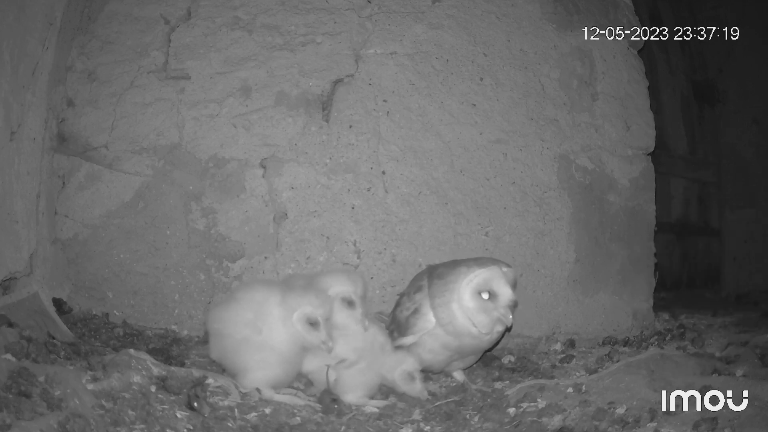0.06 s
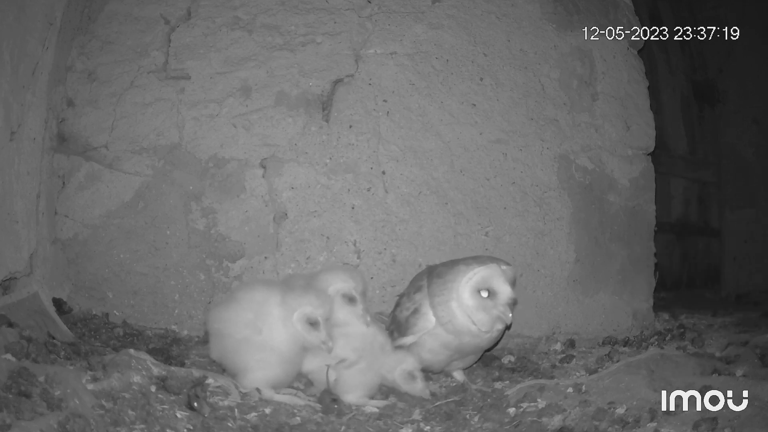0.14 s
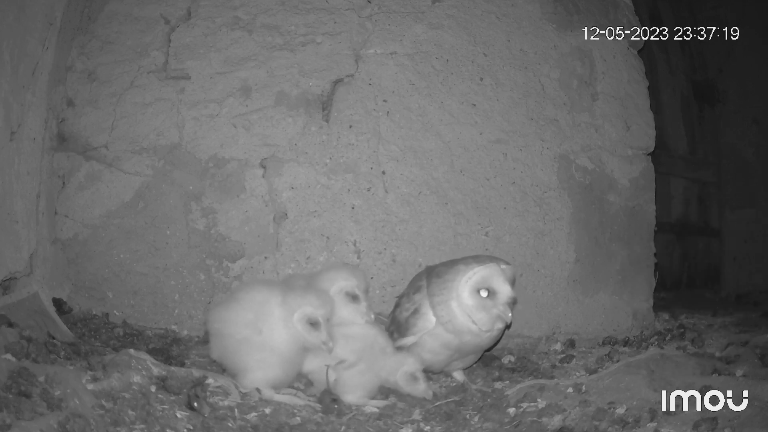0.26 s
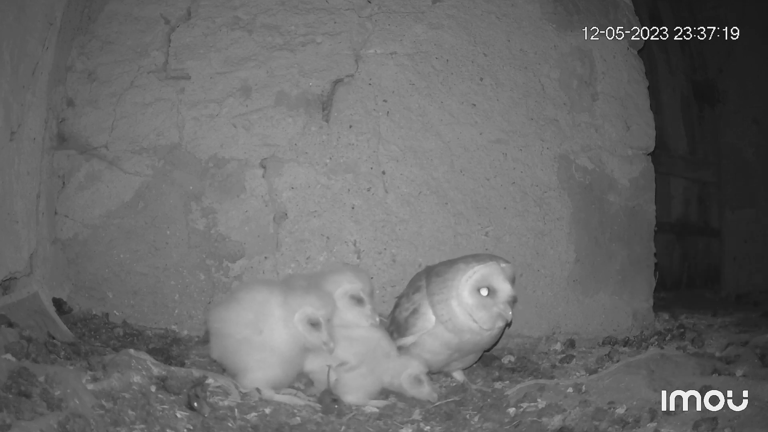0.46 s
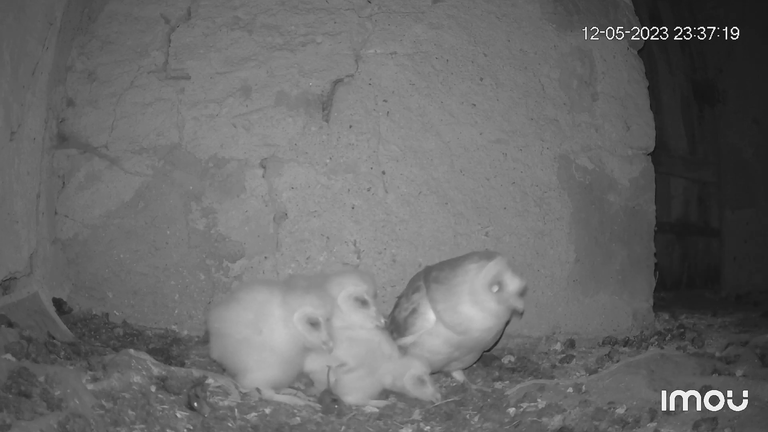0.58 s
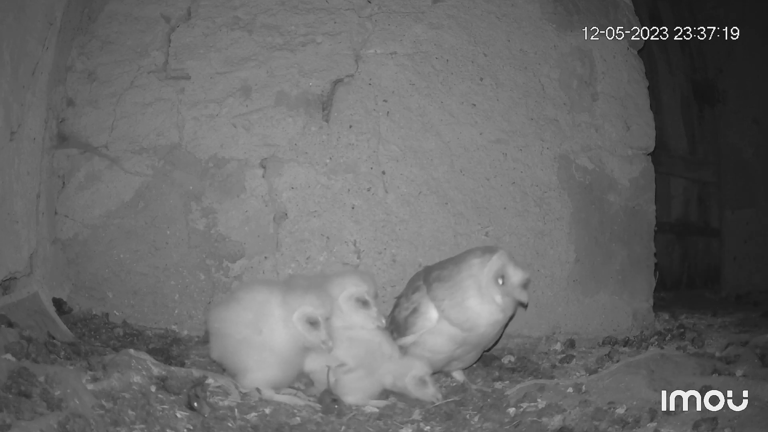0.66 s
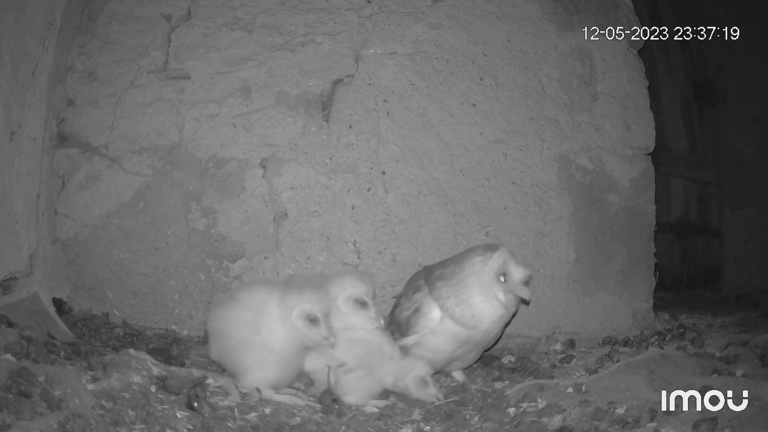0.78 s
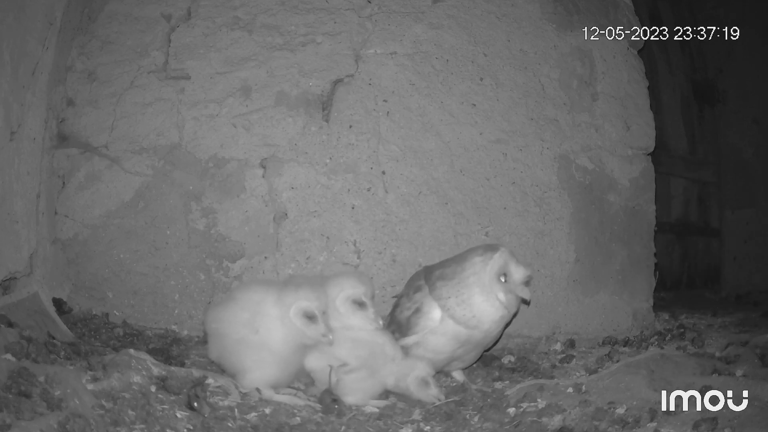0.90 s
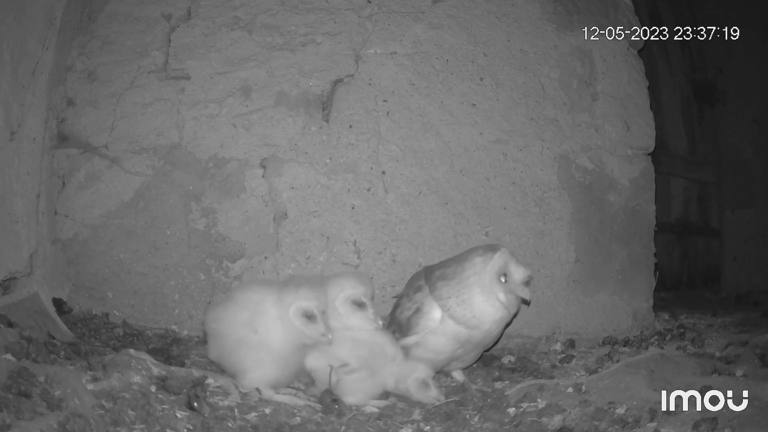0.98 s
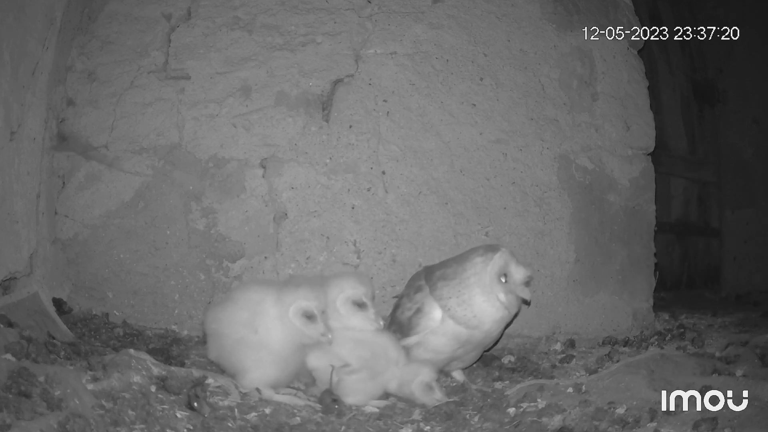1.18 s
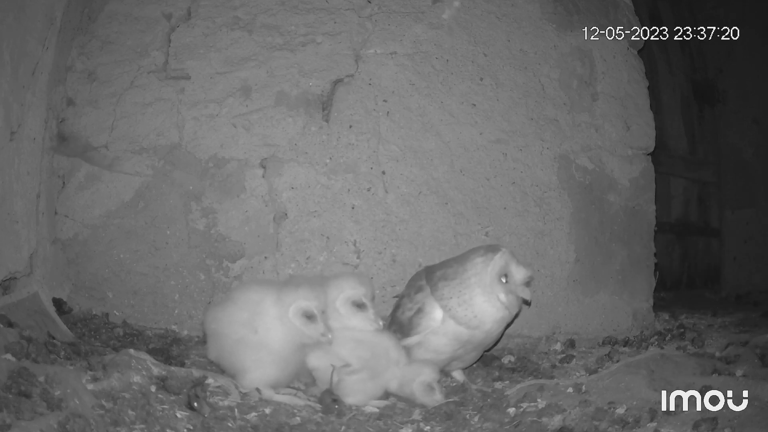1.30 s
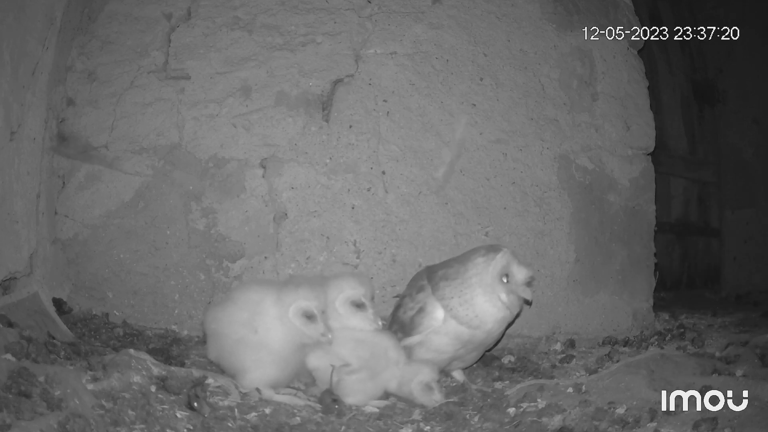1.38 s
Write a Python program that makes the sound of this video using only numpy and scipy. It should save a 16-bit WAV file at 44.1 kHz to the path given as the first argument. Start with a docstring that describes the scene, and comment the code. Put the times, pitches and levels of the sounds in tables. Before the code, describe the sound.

Raspy barn owl screech in a small stone nest space, cut off with a tiny beak snap, then deep puffs of wing-stirred air on the camera microphone, near quiet, and a second, weaker rasp farther off.

```python
"""Barn owls in a stone chamber

Two barn owls rasp in a stone nest chamber, one near and one further off, before a small camera microphone.
Breath forced through a fluttering throat rings its resonances; a beak snaps and a chick peeps faintly. Air
stirred by wings buffets the microphone: a low draught throughout and a string of puffs, a few of them hard,
with two brief higher tones ringing near the hardest. Noise is filtered for breath, beak and draught; the peep
is a falling sine, each puff a short swing of pressure."""
import sys
import numpy as np
from scipy import signal
from scipy.fft import rfft, irfft
from scipy.io import wavfile
from scipy.ndimage import uniform_filter1d

SR = 44100
rng = np.random.default_rng(int(sys.argv[2]) if len(sys.argv) > 2 else 0)


def ratio(d):
    """dB to gain"""
    e = np.asarray(d, float) / 20
    return 10 ** e


def waveform_to_disk(signal):
    """Save audio, clipped to [-1, 1], as 16-bit WAV at the path in sys.argv[1]."""
    frames = np.transpose(np.atleast_2d(signal))
    scaled = np.clip(frames, -1, 1) * 32767
    samples = np.round(scaled).astype(np.int16)
    wavfile.write(sys.argv[1], SR, samples)


N = 63945
T = np.arange(N) / SR  # time [s]


def curve(rows):
    """Straight lines through (time [s], value) rows."""
    return np.interp(T, *np.array(rows).T)


def unit(x):
    """Scale to rms 1."""
    return x / np.sqrt(np.mean(x ** 2))


def walk(rate_hz):
    """Smooth random wander of spread 1, from noise averaged twice over one period of the rate."""
    length = max(int(SR / rate_hz), 2)
    wander = uniform_filter1d(uniform_filter1d(rng.standard_normal(N), length), length)
    return unit(wander - wander.mean())


def ring(x, hz, width_hz):
    """A steep-sided resonance, so that the valleys between resonances stay dark."""
    edges = [hz - width_hz / 2, hz + width_hz / 2]
    return signal.sosfilt(signal.butter(3, edges, "band", fs=SR, output="sos"), x)


def owl(effort, top_db, throat, flutter_hz, flutter_depth, flicker_db):
    """Grainy turbulence, pulsed by a flapping membrane, rings a throat whose colour shifts with effort."""
    breathing = (T >= effort[0][0]) & (T <= effort[-1][0])
    effort_db = np.where(breathing, curve(effort), -150)
    phase = 2 * np.pi * np.cumsum(flutter_hz * (1 + 0.047 * walk(8.7))) / SR
    grains = rng.standard_normal(N) * ratio(1.5 * walk(330))  # grain size scatters by 1.5 dB
    breath = grains * (1 + flutter_depth * np.cos(phase))
    rings = [ring(breath, hz, width_hz) * ratio(db) for hz, width_hz, db, _ in throat]
    size = np.sqrt(np.mean(sum(rings) ** 2))
    above_top_db = np.clip(effort_db - top_db, -30, 6)
    rasp = 0
    for voice, (_, _, _, extra) in zip(rings, throat):
        rasp = rasp + voice * ratio(effort_db + extra * above_top_db + flicker_db * walk(40))
    return rasp / size


# Breath effort of the near owl: (time [s], effort [dB])
NEAR_EFFORT = [(0, -85.5), (.014, -74.5), (.028, -56), (.045, -49), (.1, -42.5), (.2, -40), (.25, -38.5),
               (.3, -40), (.345, -40.5), (.366, -57), (.392, -86.5)]
# Throat resonances of the near owl:
# (frequency [Hz], width [Hz], level [dB], extra level per effort [dB/dB])
NEAR_THROAT = [(480, 277, -21, -0.8), (1151.6, 294, -5.5, -0.39), (1291.3, 100, -1.5, 0),
               (1584, 125, -6.5, 1), (1855, 150, -14, 0), (2196, 180, -13.5, 2), (2610, 230, -7.5, -0.72),
               (3310, 550, -1.5, 0), (3766, 520, -3.5, -0.4), (4008, 300, 0.5, 3.24), (4556, 360, -15, 1.4),
               (6450, 800, -15.5, 3), (6810, 470, -20, 2.5)]


def near_owl():
    """One rasp close by, its throat flapping deeply; top_db is the effort that adds no extra level."""
    return owl(NEAR_EFFORT, top_db=-39, throat=NEAR_THROAT,
               flutter_hz=45.6, flutter_depth=0.33, flicker_db=2.6)


# Breath effort of the far owl: (time [s], effort [dB])
FAR_EFFORT = [(1.134, -96), (1.139, -67), (1.21, -65.5), (1.29, -57), (1.375, -54.5), (1.4, -54.5),
              (1.42, -56), (1.45, -54.5)]
# Throat resonances of the far owl:
# (frequency [Hz], width [Hz], level [dB], extra level per effort [dB/dB])
FAR_THROAT = [(851, 235, -6, 0.55), (1269, 320, -1, -.5), (1686, 67, -6, -0.86), (2039, 170, 1, 0.29),
              (2520, 290, -1, 0.07), (3250, 410, -4.5, 1), (3906, 460, -3, 0.019), (4750, 350, -16, 0.97),
              (5150, 660, -11.5, 1), (5860, 447, -14.5, .8), (7000, 150, -49, .3)]


def far_owl():
    """A fainter rasp that swells at the end, with a faster and shallower flutter."""
    return owl(FAR_EFFORT, top_db=-49.5, throat=FAR_THROAT,
               flutter_hz=50, flutter_depth=0.098, flicker_db=3.1)


# Beak ticks: (time [s], drive level [dB])
SNAPS = [(.001, -58.5), (0.4035, -59.5), (.407, -54), (0.427, -73.5)]
# Beak resonances: (frequency [Hz], width [Hz], level [dB])
BEAK = [(1660, 100, -10), (2156, 380, -5), (2920, 430, 1.5), (4120, 500, -18.5), (4400, 170, -19.5)]


def snaps():
    """Each tick is a short rough scrape, dying away at once, into the resonances of the beak."""
    t60_s = 0.022
    strength = sum(ratio(db) * (T > s) * 1000. ** (-np.maximum(T - s, 0) / t60_s) for s, db in SNAPS)
    scrape = strength * rng.standard_normal(N)
    # the root makes up for the noise power that a narrow resonance loses
    return sum(ratio(db) * np.sqrt(SR / width_hz) * ring(scrape, hz, width_hz) for hz, width_hz, db in BEAK)


def peep():
    """A chick's faint peep: a sine falling steadily in pitch under a bell-shaped swell."""
    centre_s, length_s, level_db = 1.122, 0.0098, -81
    centre_hz, fall_hz_per_s = 3200, 30000
    t = T - centre_s
    swell = np.exp(-(t / length_s) ** 2)
    return ratio(level_db) * swell * np.sin(2 * np.pi * (centre_hz * t - fall_hz_per_s * t ** 2 / 2))


# Wing puffs on the microphone, and two brief higher tones at 338 and 480 Hz that ring for several cycles near
# 0.51 s: (time [s], level [dB], swing frequency [Hz], length at half height [cycles])
PUFFS = [(0.069, -39.5, 30.27, 0.58), (0.241, -29, 30, 0.61), (.435, -18, 59.7, 0.7),
         (.455, -26.5, 61.13, .6), (.48, -33.5, 44.65, .6), (.488, -26.5, 145.6, 1.8),
         (0.508, -15, 212, 1.6), (0.509, -33, 338, 5.5), (0.513, -40, 480, 3.1), (0.522, -15.5, 71.7, 1.2),
         (.539, -25, 50, 0.56), (0.553, -21, 60.1, .7), (0.58, -25.5, 35.15, 0.67), (.617, -10.5, 61, 0.42),
         (.641, -26, 30.3, .9), (.659, -28, 112.4, 0.52), (0.81, -41, 45.8, 0.8), (0.911, -36, 55, 0.86),
         (1, -42.5, 87.7, 0.64), (1.031, -36.5, 44.8, 1.06), (1.17, -34.5, 54.4, 0.71),
         (1.231, -34, 53.6, 0.72), (1.332, -33.5, 35.5, 1.52)]


def puffs():
    """Each eddy sucks sharply at the membrane and lets it swing back; the two higher rows near 0.51 s are tones
    that ring on for several cycles."""
    pressure = 0
    for s, db, hz, cycles in PUFFS:
        swings = (T - s) * hz
        envelope = 1 / (1 + (swings / cycles) ** 2 * 1.61) ** 2
        pressure = pressure - ratio(db) * np.cos(2 * np.pi * swings) * envelope
    return pressure


def coloured(points):
    """Noise of rms 1 with the spectrum of (frequency [Hz], level [dB]) points, joined over log frequency."""
    hz, db = np.array(points).T
    f = np.fft.rfftfreq(N, 1 / SR) + 1  # 1 Hz up, to keep the log finite
    gain = ratio(np.interp(np.log(f), np.log(hz), db, left=-60))
    return unit(irfft(rfft(rng.standard_normal(N)) * gain, N))


# Course of the draught before its gusts: (time [s], level [dB])
DRAUGHT_LEVEL = [(0, -59), (.05, -48), (.26, -46), (.29, -57.5), (.35, -48), (.39, -51.5), (.43, -39),
                 (.51, -24), (.58, -37), (.62, -28), (.67, -39.5), (.71, -51.5), (.77, -60.5), (.82, -50),
                 (.87, -72.5), (.91, -43), (1.04, -49), (1.1, -62.5), (1.14, -45), (1.24, -50.5),
                 (1.28, -47), (1.33, -57.5), (1.39, -55.5), (1.45, -36.5)]
# Relative spectrum of the draught: (frequency [Hz], density [dB per Hz])
DRAUGHT_SPECTRUM = [(12, -20), (25, -2), (50, -1), (100, -22.5), (200, -28), (300, -41), (500, -48.5),
                    (900, -60.5), (2000, -84.5)]


def draught():
    """Air moving over the microphone: low rumbling noise whose level gusts at random."""
    gust_db, gust_hz = 4.5, 25.7
    return coloured(DRAUGHT_SPECTRUM) * ratio(curve(DRAUGHT_LEVEL) + gust_db * walk(gust_hz))


def chamber(birds):
    """The short ring of the stone chamber: a decaying noise tail of unit energy, 14 dB down."""
    t60_s, level_db = 0.11, -14
    tail = unit(rng.standard_normal(N) * 1000. ** (-T / t60_s)) / np.sqrt(N)
    return ratio(level_db) * signal.fftconvolve(birds, tail)[:N]


def hiss():
    """Patchy camera hiss: ten bands of noise, each flickering on its own."""
    level_db, flicker_db = -85.5, 2.1
    bands = [ring(rng.standard_normal(N), hz, 700) * ratio(flicker_db * walk(30))
             for hz in range(700, 7400, 700)]
    return ratio(level_db) * unit(sum(bands))


def following_noise(dry):
    """Noise that grows with loudness, 63.5 dB under the momentary size of the signal."""
    return ratio(-63.5) * np.abs(dry) * rng.standard_normal(N)


def scene():
    """Birds with the ring of the chamber, and the air that strikes the microphone directly."""
    birds = near_owl() + far_owl() + snaps() + peep()
    air = puffs() + draught()
    return (birds + chamber(birds) + air)[None]  # one channel


def band_limit(x):
    """A steep low-pass at the top of the band."""
    return signal.sosfilt(signal.butter(12, 7400, fs=SR, output="sos"), x)


def record(dry):
    """The camera adds hiss; a faint noise follows the loudness, and the treble ends steeply at 7350 Hz."""
    noisy = dry + hiss() + following_noise(dry)
    mix = signal.sosfilt(signal.ellip(8, 0.2, 45, 7350, fs=SR, output="sos"), noisy)
    return band_limit(mix)


dry = scene()
out = record(dry)
waveform_to_disk(out)
```